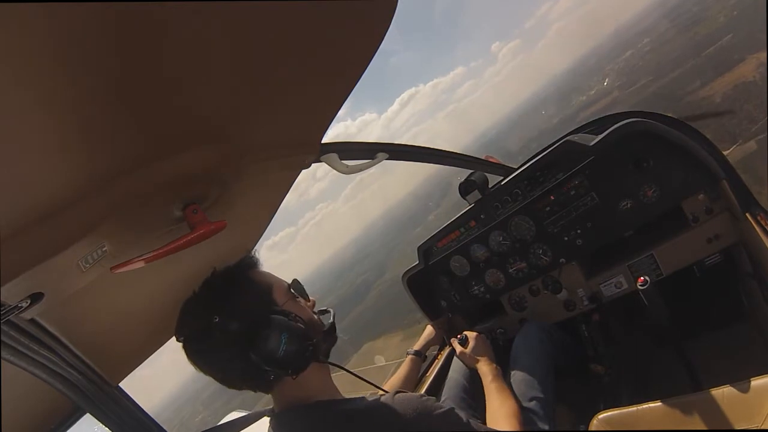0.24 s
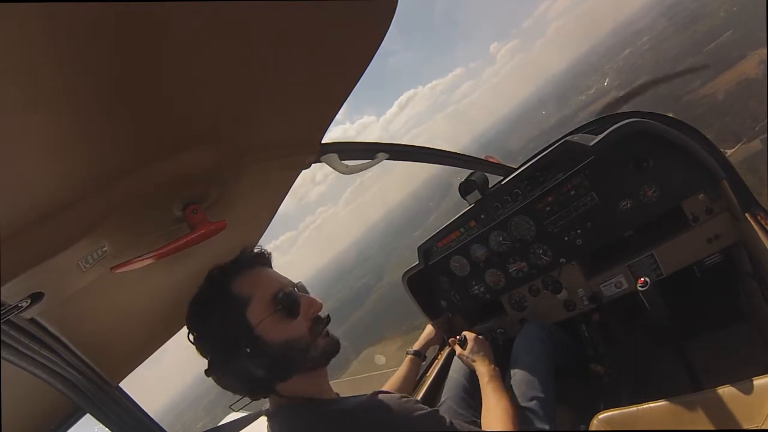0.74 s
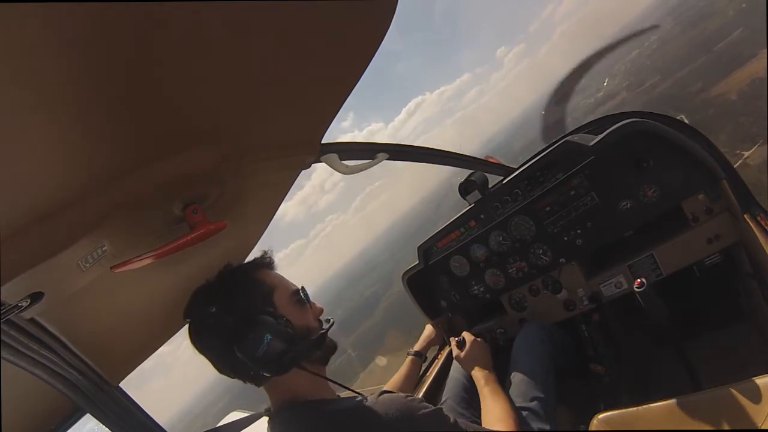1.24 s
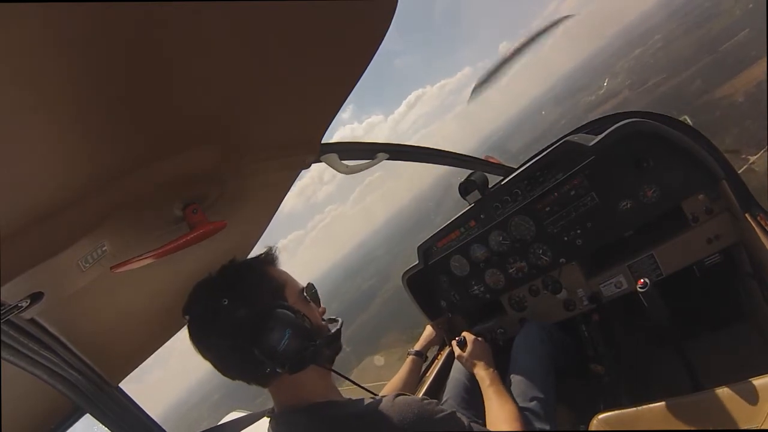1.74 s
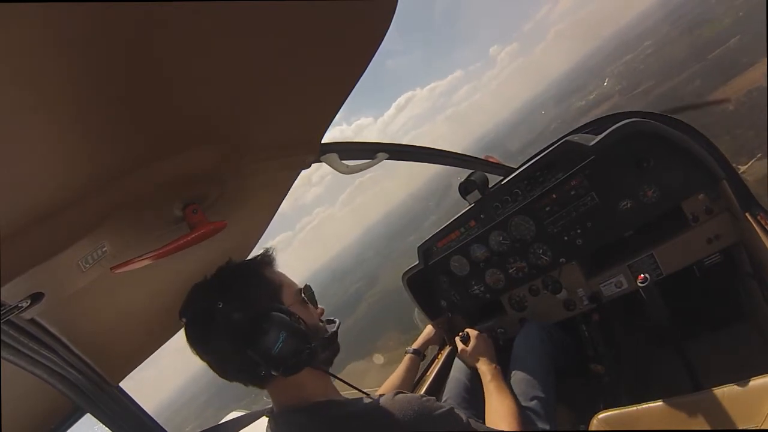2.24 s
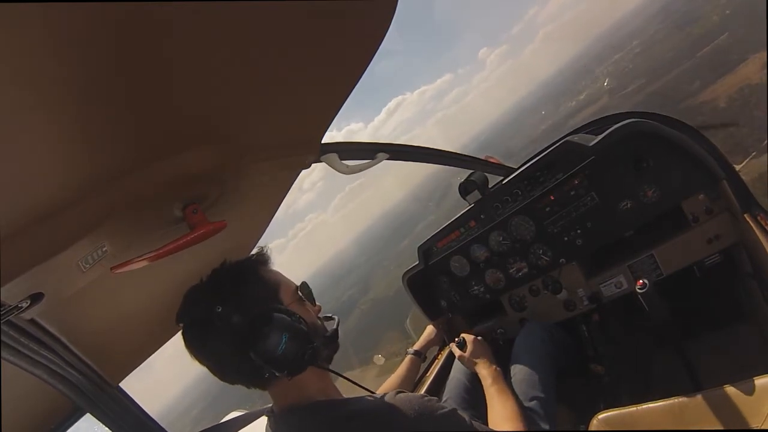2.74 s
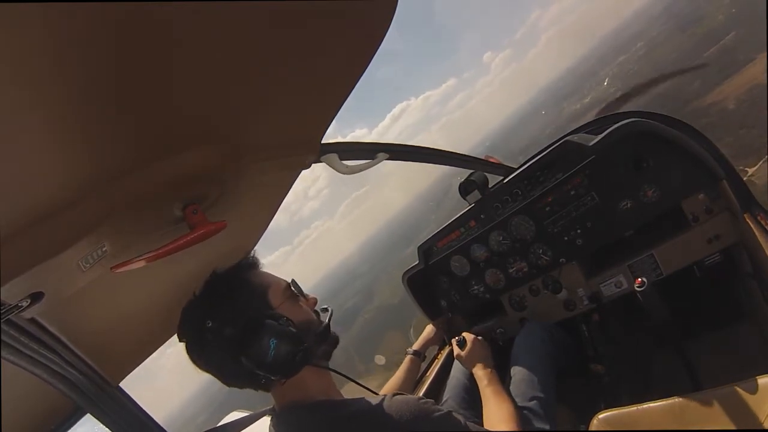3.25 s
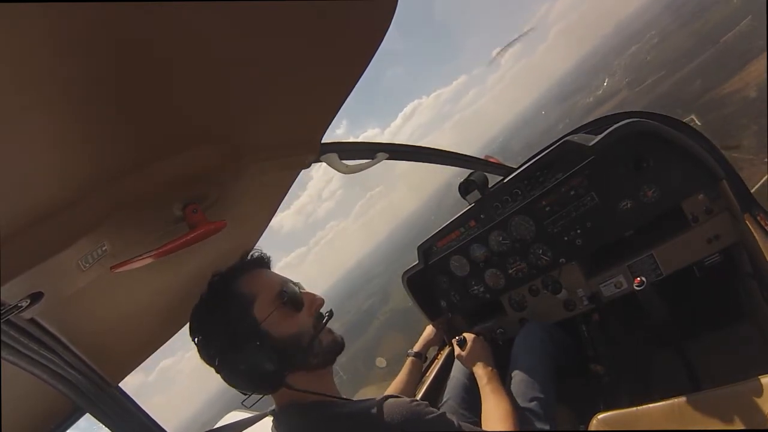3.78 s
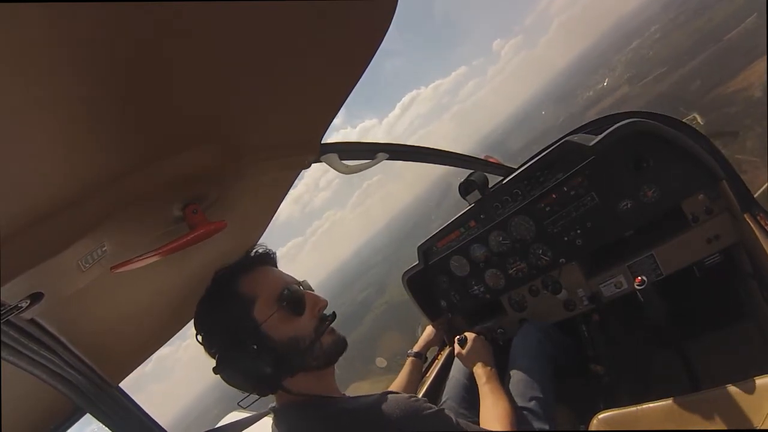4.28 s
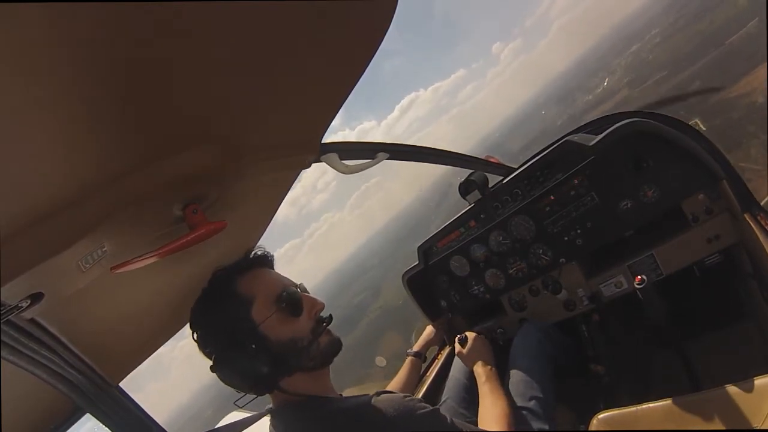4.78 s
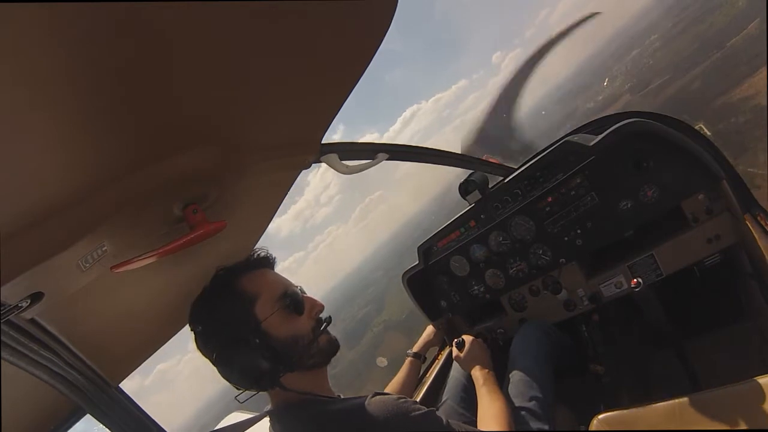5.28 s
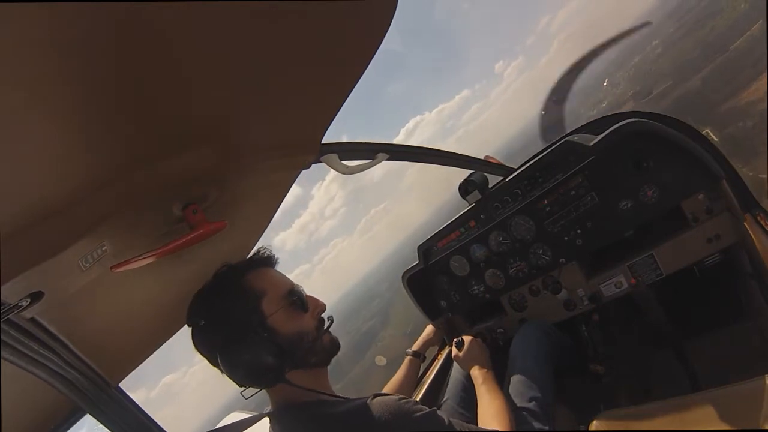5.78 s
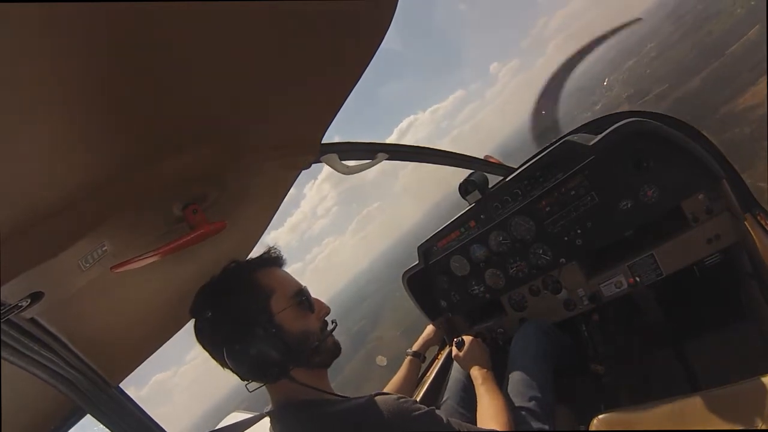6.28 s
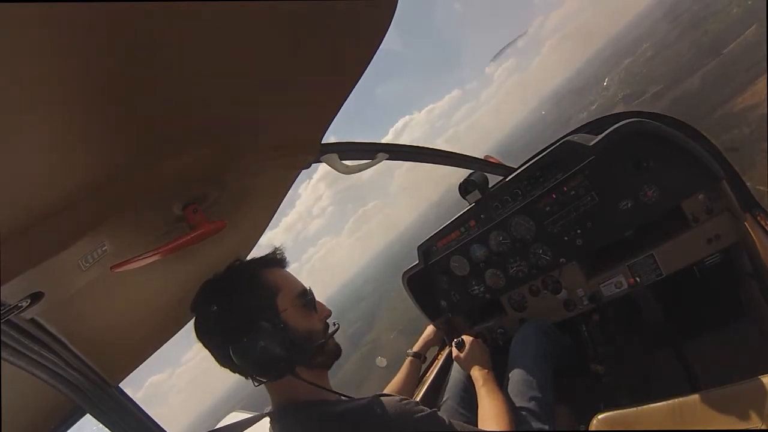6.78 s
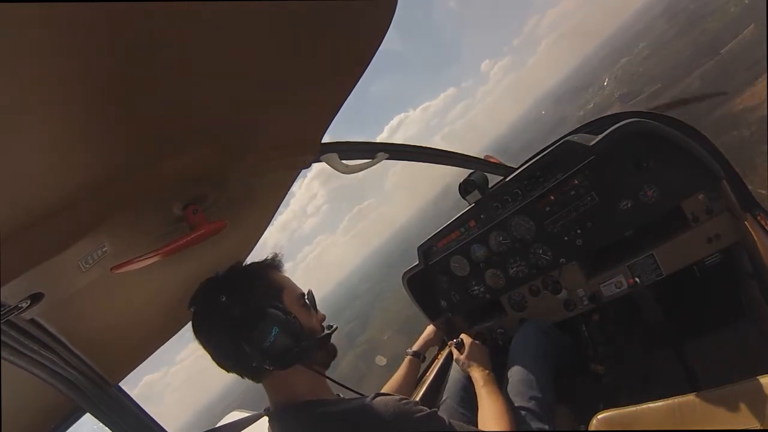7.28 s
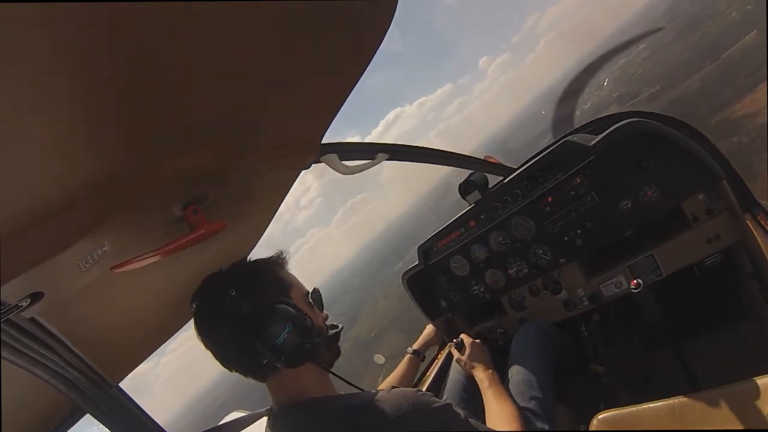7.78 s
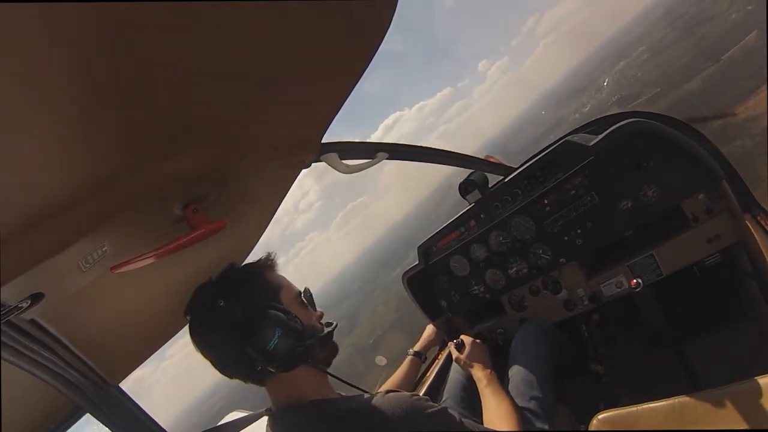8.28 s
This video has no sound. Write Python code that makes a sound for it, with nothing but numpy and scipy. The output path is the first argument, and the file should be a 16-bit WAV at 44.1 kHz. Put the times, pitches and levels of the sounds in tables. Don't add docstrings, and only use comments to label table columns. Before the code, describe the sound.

Inside a light aircraft cabin in cruise, a very deep, irregular air throb dominates, with steady slipstream rush and a constant low engine hum buzzing through loose panels. Soft low bumps come occasionally; the hardest, before three seconds, arrives with a short crackling creak from the mount. One close microphone fixed to the frame, practically mono, with faint hiss and thin electronic whine.

```python
import sys
import numpy as np
from scipy import signal
from scipy.fft import rfft, irfft, next_fast_len
from scipy.io import wavfile
from scipy.ndimage import uniform_filter1d

SR = 44100
rng = np.random.default_rng(int(sys.argv[2]) if len(sys.argv) > 2 else 0)


def put_to_file(sound):
    columns = np.atleast_2d(sound).T
    safe = np.clip(columns, -1, 1)
    whole_steps = np.round(safe * 32767)
    wavfile.write(sys.argv[1], SR, whole_steps.astype(np.int16))


def invert_db(x):
    u = np.asarray(x, float) / 20
    return 10 ** u


N = 376173

# t/s, f/Hz
THROB_RATE = [(0.0, 39.45), (0.78, 43.73), (1.55, 42.27), (2.33, 43.17), (3.1, 41.09), (3.88, 42.83),
              (4.65, 42.77), (5.43, 41.47), (6.2, 42.1), (6.98, 41.14), (7.75, 42.63), (8.53, 40.39)]
# t/s, delay/ms
STUMBLES = [(0.247, -5.4), (0.329, -6.9), (0.424, -3.2), (1.512, 8.6), (1.567, 5.1), (1.683, 6.9),
            (1.737, 5.1), (1.839, -6.8), (2.744, -6.3), (2.798, -8.6), (3.166, 8.4), (3.274, 4.6),
            (3.39, 9.4), (4.179, -8.2), (4.37, -5.9), (4.676, 6.2), (4.73, 7.9), (4.859, 8.4),
            (5.118, -9.5), (6.295, 7.6), (6.37, 7.2), (6.465, 11.0), (6.662, -3.3), (7.179, 2.8),
            (7.88, 7.9), (7.934, 9.5), (8.029, 4.8), (8.091, 6.5), (8.206, 8.5), (8.302, -4.7)]
# f/Hz, level/dB
WAKE_COLOUR = [(22, -30), (32, -17), (45, 0.5), (68, 4), (95, -7), (115, -9), (140, -25)]

# t/s, level/dB
SWELL = [(0, 0.8), (.4, -0.1), (.95, 0), (1.45, 0.6), (2.1, -0.3), (2.7, -0.4), (2.9, .1), (3.45, 0.5),
         (3.85, 2.5), (4.5, 1), (4.72, 0.2), (4.92, 0.8), (5.4, .5), (5.74, -0.5), (5.95, 0), (7.1, -0.8),
         (7.55, -0.6), (8.4, -1.6)]
# f/Hz, level/dB
RUSH_COLOUR = [(400, -16), (650, -19), (820, -9), (1200, -4), (2010, -0.5), (2600, -2.5), (3220, -2),
               (4570, -7), (5300, -12.5), (7200, -19), (8200, -29), (10000, -43), (13000, -60),
               (15200, -70)]
# f/Hz, width/Hz, level over the rush/dB
CABIN_RINGING = [(628, 22, 2.5), (698, 21, 7), (960, 70, -3), (1557, 91, -2), (1540, 36, -7),
                 (1824, 74, -6), (2035, 56, -2.5), (2047, 26, 1.5), (2320, 51, 0), (2515, 250, -2.5),
                 (2690, 20, 4), (4330, 23, -2.5), (4330, 24, -12.5), (4960, 50, 2)]
# f/Hz, level/dB
SHUDDER_COLOUR = [(250, -6), (420, -3.5), (550, 0.5), (700, -2.5), (900, -3.5), (1300, -15)]
# t/s, peak level/dB, width/s
GUSTS = [
    (0.01, -36, 0.023),
    (.1, -42.5, 0.15),
    (2.26, -44, 0.23),
    (7.9, -53, .5),
]
# f/Hz, level/dB
HISS_COLOUR = [(5000, -20), (7500, 7), (9000, 2), (10500, -5), (12000, -10), (14000, -16), (15200, -20)]
# f/Hz, level/dB
SENSOR_COLOUR = [(8000, -8), (11000, 4), (13000, -2), (15000, -2), (15260, 1)]

# f/Hz, level/dB
PANEL_COLOUR = [(150, -27), (200, -6), (240, -8.5), (280, 2), (320, 0), (370, -7.5), (430, -19), (600, -69)]
# f/Hz, level/dB
RUMBLE_COLOUR = [(105, -34), (125, -7), (150, -4.5), (200, -5.5), (240, -4.5), (300, -14.5), (400, -21)]
# multiple of the firing rate, rms level/dB
ENGINE_TONES = [(1, -40.5), (2, -47.5), (3, -42.5), (5, -64), (6, -68), (7, -68.5), (8, -67.5)]

# t/s, swing of pressure (its sign tells which way first)
BUMPS = [
    (.238, 0.016),
    (1.831, -0.047),
    (2.682, .06),
    (2.77, 0.16),
    (6.632, 0.1),
]
# t/s, crackle peak level/dB, knock peak level/dB
CREAK_SLIPS = [
    (2.676, -41, -40),
    (2.684, -34, -34),
    (2.716, -20, -24),
    (2.720, -34, -30),
    (2.736, -34, -24),
    (2.750, -41, -36),
    (2.757, -26, -26),
    (2.768, -38, -30),
    (2.786, -34, -27),
]
WHINES_HZ = [11408.3, 12499.7]
WHINES_DB = [-64, -72.5]

# t/s, centre f/Hz
SPLITS = [(.168, 6200), (.168, 13800), (.354, 9650), (.784, 9950), (.853, 10300), (1.146, 6550),
          (1.146, 8900), (1.921, 6950), (1.921, 8950), (2.174, 5300), (2.174, 7100), (2.9, 5950),
          (2.966, 4900), (3.587, 7200), (3.587, 10300), (4.072, 9900), (4.243, 6950), (4.316, 4650),
          (4.461, 6950), (4.461, 13800), (4.557, 6550), (4.746, 7200), (5.074, 13800), (5.959, 13800),
          (7.404, 10000), (7.784, 13800)]


def buffet():
    hz = in_time(THROB_RATE)[0] - 42 * stumbles()
    quicker_hz = uniform_filter1d(hz, size=2400) - 42
    phase = 2 * np.pi * np.cumsum(hz) / SR + 0.17 * drift(26) + 3.68
    dip = invert_db(0.5 * drift(9.3)) * np.cos(phase)
    octave_db = -3 - 0.7 * quicker_hz
    dip -= invert_db(octave_db + 0.5 * drift(16)) * np.cos(2 * phase + 0.16)
    dip += invert_db(-18) * np.sin(3 * phase)
    throb_db = -27.3 + 0.5 * quicker_hz
    throb = invert_db(throb_db) * (np.sqrt(2) * dip + invert_db(-9.5) * coloured(WAKE_COLOUR))
    throb_band = signal.butter(3, [28, 150], "band", fs=SR, output="sos")
    return signal.sosfiltfilt(throb_band, throb)


def stumbles():
    late = np.zeros(N)
    for s, delay_ms in STUMBLES:
        late[round(s * SR)] = delay_ms / 1000 * SR
    bell = np.hanning(1900)
    return signal.fftconvolve(late, bell / bell.sum(), "same")


def airflow(swell_db):
    shudder = gusts(swell_db) * invert_db(-1.5 + 1.2 * drift(11)) * coloured(SHUDDER_COLOUR)
    rush = reflected(coloured(RUSH_COLOUR, CABIN_RINGING))
    treble = signal.sosfiltfilt(signal.butter(1, 3200, "high", fs=SR, output="sos"), rush)
    treble_gain = invert_db(0.7 - 0.25 * swell_db)
    rush = rush + (treble_gain - 1) * treble
    rush_db = -31.5 + 1.13 * swell_db + 0.17 * drift(21)
    microphone = invert_db(-58.5) * coloured(HISS_COLOUR) + invert_db(-71) * coloured(SENSOR_COLOUR)
    return shudder + invert_db(rush_db) * rush + microphone


def gusts(swell_db):
    t = np.arange(N) / SR
    steady_power = invert_db(2 * (-50 + 0.4 * swell_db))
    gust_power = sum(invert_db(2 * db) * np.exp(-((t - s) / width) ** 2) for s, db, width in GUSTS)
    return np.sqrt(steady_power + gust_power)


def reflected(x):
    t = np.arange(1, 2000) / SR
    echo_db, t60_s = -15, 0.06
    clouds = rng.standard_normal((4, len(t))) * invert_db(-60 * t / t60_s) * (t > 0.003)
    out = x
    for cloud in clouds:
        echo = signal.fftconvolve(x, cloud / np.linalg.norm(cloud))[:N]
        out = out + invert_db(echo_db) * (0.3 + 0.7 * drift(0.5)) * echo
    return rms_one(out)


def panels():
    shaking = invert_db(-39.5) * coloured(PANEL_COLOUR) + engine(ENGINE_TONES[2:3])
    swing = self_limited(shaking, firmness=0.85)
    swing = signal.sosfilt(signal.butter(4, 420, fs=SR, output="sos"), swing)
    return invert_db(-34.5) * (invert_db(-2.5) * rms_one(swing) + invert_db(-4.5) * coloured(RUMBLE_COLOUR))


def self_limited(x, firmness):
    envelope = np.abs(signal.hilbert(x, next_fast_len(N))[:N])
    swing = envelope / np.sqrt(2 * np.mean(x ** 2))
    return x * (swing ** 2 + 0.1) ** (-firmness / 2)


def engine(tones):
    firing_hz = 100.69
    phase = 2 * np.pi * firing_hz * np.arange(N) / SR + 0.18 * drift(2.0)
    hum = np.zeros(N)
    for multiple, db in tones:
        loudness = invert_db(db + 1.5 * drift(3.6))
        hum += loudness * np.sin(multiple * phase + rng.uniform(0, 2 * np.pi))
    return np.sqrt(2) * hum


def bumps():
    t = np.arange(N) / SR
    swing_hz, width_s = 78, 0.0085
    out = np.zeros(N)
    for s, size in BUMPS:
        bell = np.exp(-((t - s) / width_s) ** 2)
        out -= size * np.sin(2 * np.pi * swing_hz * (t - s)) * bell
    return out


def creak():
    out, t = np.zeros(N), np.arange(600) / SR
    housing = signal.butter(2, [1500, 12000], "band", fs=SR, output="sos")
    knock = np.sin(2 * np.pi * 620 * t) + 0.9 * np.sin(2 * np.pi * 1050 * t)
    knock = knock * np.exp(-t / 0.0012)
    for s, crackle_db, knock_db in CREAK_SLIPS:
        crackle = signal.sosfilt(housing, rng.standard_normal(len(t)) * np.exp(-t / 0.0005))
        out[round(s * SR):][:len(t)] += invert_db(crackle_db) * crackle + invert_db(knock_db) * knock
    return out


def electronics():
    t = np.arange(N) / SR
    clock_hz, sweep_hz, frame_hz = 9959.87, 500, 30.0
    frame_turn = 2 * np.pi * frame_hz * t
    clock = np.sin(2 * np.pi * clock_hz * t + sweep_hz / frame_hz * np.sin(frame_turn))
    clock_db = -69.5 - 2.5 * np.cos(frame_turn)
    whines = sum(invert_db(db) * np.sin(2 * np.pi * hz * t) for hz, db in zip(WHINES_HZ, WHINES_DB))
    return np.sqrt(2) * (whines + invert_db(clock_db) * clock)


def in_time(rows):
    s, *columns = np.transpose(rows)
    return [np.interp(np.arange(N) / SR, s, column) for column in columns]


def rms_one(x):
    return x / np.sqrt(np.mean(x ** 2) + 1e-20)


def drift(rate_hz):
    r = np.exp(-2 * np.pi * rate_hz * 40 / SR)
    noise = rng.standard_normal(N // 40 + 2002)
    slow = signal.lfilter([1], [1, -2 * r, r * r], noise)[2000:]
    return np.interp(np.arange(N) / 40, np.arange(len(slow)), rms_one(slow))


def coloured(points, resonances=()):
    size = next_fast_len(N)
    hz = np.maximum(np.arange(size // 2 + 1) * SR / size, 1)
    at, db = np.transpose(points)
    power = invert_db(2 * np.interp(np.log(hz), np.log(at), db, left=-90, right=-90))
    for centre, width, peak_db in resonances:
        power = power * (1 + invert_db(2 * peak_db) / (1 + (2 * (hz - centre) / width) ** 2))
    spectrum = rfft(rng.standard_normal(size)) * np.sqrt(power)
    return rms_one(irfft(spectrum, size)[:N])


def scene():
    swell_db = in_time(SWELL)[0]
    cabin = buffet() + bumps()
    cabin += engine(ENGINE_TONES[:2] + ENGINE_TONES[3:])
    cabin += panels()
    cabin += airflow(swell_db)
    cabin += creak() + electronics()
    return np.stack([cabin, cabin])


def splits(x):
    out, bell = x.copy(), signal.windows.tukey(1600, 0.5)
    for s, hz in SPLITS:
        start = round(s * SR) - len(bell) // 2
        width_hz = min(1600, hz / 5)
        band = signal.butter(4, hz + width_hz * np.array([-0.5, 0.5]), "band", fs=SR, output="sos")
        now = x[0, start:][:len(bell)]
        earlier = x[0, start - 4000:][:len(bell)]
        own, other = signal.sosfiltfilt(band, [now, earlier]) * bell
        out[:, start:start + len(bell)] += invert_db(-2.5) * other * [[1], [-1]] - 0.25 * own
    return out


def roll_off(x):
    return signal.sosfilt(signal.butter(12, 15710, fs=SR, output="sos"), x)


def record(dry):
    held = dry * invert_db(-in_time(SWELL)[0])
    return roll_off(splits(held))


dry = scene()
out = record(dry)
put_to_file(out)
```